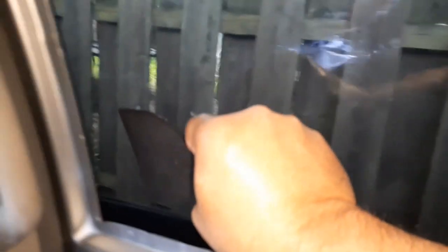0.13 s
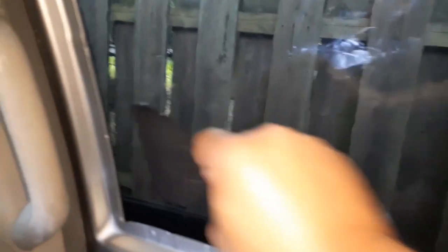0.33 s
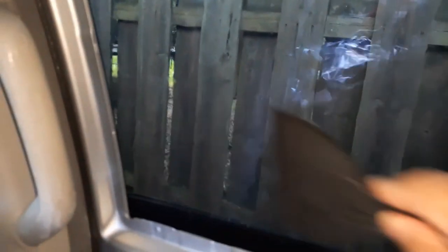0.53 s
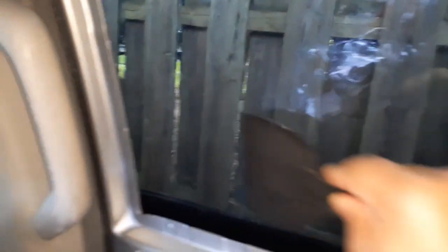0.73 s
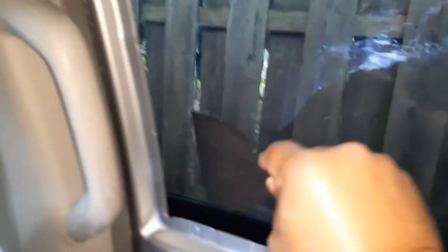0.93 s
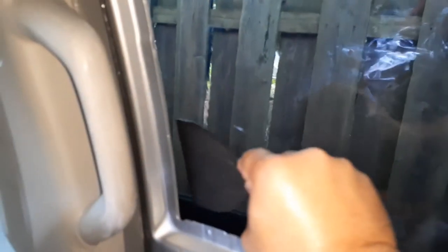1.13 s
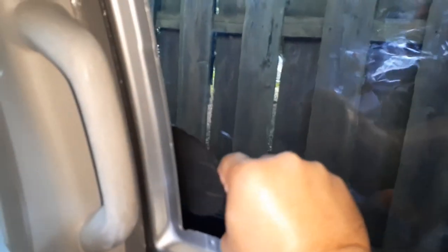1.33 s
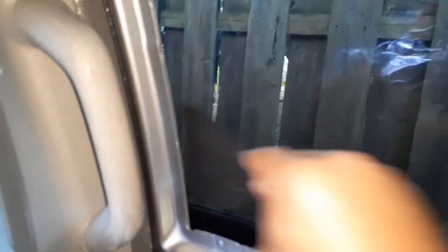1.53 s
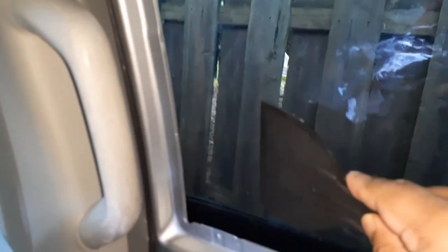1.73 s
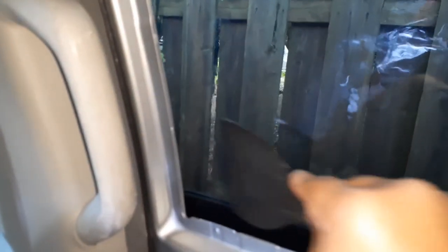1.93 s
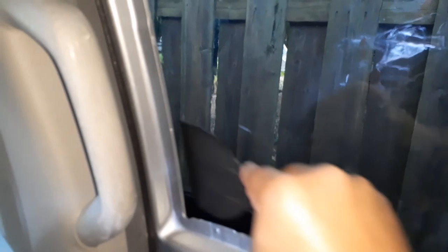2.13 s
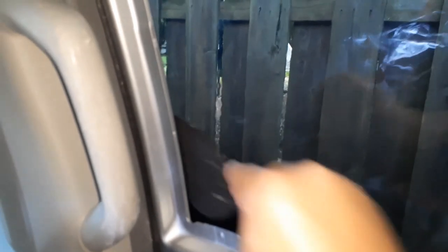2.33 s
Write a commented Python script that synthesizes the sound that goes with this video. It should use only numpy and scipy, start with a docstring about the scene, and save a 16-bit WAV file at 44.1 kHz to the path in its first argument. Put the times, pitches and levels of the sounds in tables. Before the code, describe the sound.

A plastic squeegee knocks on a car window frame with a hollow boom, ticks lightly, knocks twice softly, then ends in a scrape and loud clacks; close stereo microphone inside the car, low rumble and faint chips outside.

```python
"""A low rumble and a dull wash outside, heard from inside a car, with a faint hum of the side window.
A plastic hand squeegee then works over wet film on the glass: blade on frame gives clack and boom,
light touches tick and ring, slips give pips and a scrape. A small animal, perhaps a chipmunk, chips 3 times.
Shaped noise makes wash, roar, clacks and grains; decaying sines make the ringing parts.
The rumble adds wavering sines to noise; each chip is a falling sine smeared by echoes."""
import sys
import numpy as np
from scipy import signal
from scipy.fft import rfft, irfft
from scipy.io import wavfile
from scipy.ndimage import uniform_filter1d

SR = 44100
rng = np.random.default_rng(int(sys.argv[2]) if len(sys.argv) > 2 else 0)


def wav_out(sig):
    """Save sig, one row per channel (or a flat mono array), as 16-bit PCM at SR to the path in sys.argv[1]."""
    wavfile.write(sys.argv[1], SR, np.round(np.clip(np.atleast_2d(sig).T, -1, 1) * 32767).astype(np.int16))


N = 105222
T = np.arange(SR * 3 // 4) / SR  # time axis of one event, s

# Spectra: freq_hz, relative_db_per_hz. Decay bands: freq_hz, t60_s. Modes: freq_hz, relative_db, t60_s.
# left-right likeness of near and far sounds: freq_hz, correlation
NEAR_LIKENESS = [(60, .93), (130, 1), (300, 0.36), (640, 0.66), (1400, -0.22), (3000, -0.14),
                 (15000, 0.021)]
FAR_LIKENESS = [(60, 0.99), (130, 0.98), (290, 0.87), (640, 0.31), (1400, 0), (15000, 0.039)]

# rumble spectrum: freq_hz, relative_db_per_hz
RUMBLE_SPECTRUM = [(20, -48), (40, -28), (65, -2), (92, -3), (120, -8.5), (170, -12), (240, -12),
                   (300, -15), (400, -55), (800, -48.5), (2000, -90)]
# beating tones in the rumble: freq_hz, level_over_rumble_noise_db
DRONE_TONES = [(66, -9), (78, -9), (91.5, -1), (105, -9)]
# wash spectrum: freq_hz, relative_db_per_hz
WASH_SPECTRUM = [(100, 6), (400, -5), (560, -2), (800, 4), (1700, 3), (2300, -6), (3000, -20),
                 (5800, -28.5), (7300, -30.5), (9000, -23), (15500, -26)]
# outdoor levels: time_s, rumble_db, wash_db
OUTDOOR_LEVELS = [(0, -58, -63), (.25, -55, -62), (.7, -51, -61), (1.099, -53.5, -62), (1.35, -51, -58),
                  (1.8, -50.5, -58), (1.94, -48, -56.5), (2.02, -48.5, -57.5), (2.38, -53.5, -57)]
# low-mid roar spectrum: freq_hz, relative_db_per_hz
ROAR_SPECTRUM = [(100, -21), (220, 7), (300, -0.5), (430, -0.5), (550, -6), (900, -12.5), (2000, -46.5)]
# roar level: time_s, level_db
ROAR_LEVELS = [(0, -80), (1.1, -72), (1.8, -62.5), (2.38, -65)]
WAVER_RMS_HZ = 1.85

# chips: start_s, level_db
CHIP_CALLS = [(0.52, -44), (1.188, -44.5), (1.842, -44)]
# path of one chip: time_from_start_s, pitch_hz, relative_db
CHIP_PATH = [(0, 11450, -6.5), (.010, 11400, -5), (.018, 10950, -7.5), (0.023, 9300, -12.5),
             (0.034, 7900, -11.5), (.038, 6200, -11), (.047, 4940, -14), (.056, 4350, -13)]
CHIP_JITTER_RATIO, CHIP_PAN_DB = 0.011, -3
YARD_T60_S, YARD_RISE_S = 0.23, 0.033

# wet pips of the blade on the film: start_s, pitch_hz, level_db
WET_PIPS = [(1.308, 1690, -49), (2.146, 1725, -38.5)]
# gritty scrape: time_s, level_db
SCRAPE_LEVELS = [(2.225, -78), (2.234, -55), (2.254, -44), (2.272, -47), (2.286, -68)]
# scrape grain spectrum: freq_hz, relative_db_per_hz
GRAIN_SPECTRUM = [(200, -12), (420, -16), (590, 5), (1000, -13), (1700, 14), (3200, -3), (5000, -17),
                  (7000, -19), (10000, -18), (16000, -32)]
PIP_T60_S, PIP_RISE_S = 0.019, 0.0013
GRAINS_PER_S, GRAIN_SPREAD_DB, GRAIN_T60_S = 600, 5, 0.012

# blade touches on glass: start_s, click_db, tilt_db_per_octave, ring_db, left_minus_right_db
BLADE_TICKS = [(0.5422, -33, 1, -59, 1), (0.5737, -33.5, -1.5, -47, 2.5), (1.48, -40, 0, -58, -5),
               (1.4932, -38, 0, -54, 0.5), (1.669, -41, -1.5, -50.5, -1), (1.692, -49, -1, -61, 3),
               (1.706, -51.5, 1, -57.5, 0), (1.7915, -55.5, 6, -75, -1), (2.2466, -39, -4.5, -46.5, -7),
               (2.2532, -39, -0.5, -54, -4), (2.267, -35.5, -4.5, -55, 2)]
# click spectrum: freq_hz, relative_db_per_hz
TICK_SPECTRUM = [(100, 5), (300, 7), (600, -11), (1100, 0), (1600, 3.5), (2600, -3), (5000, -9),
                 (7500, -16.5), (11000, -12), (16000, -20)]
# blade edge modes: freq_hz, relative_db, t60_s
BLADE_EDGE_MODES = [(1410, -11, 0.042), (1646, -14, 0.004), (5260, -18, 0.0037)]
# ring spectrum: freq_hz, relative_db_per_hz
RING_SPECTRUM = [(80, -36), (200, 12), (300, -1.5), (480, -20), (670, -1.5), (900, -17), (2000, -27),
                 (5000, -71)]
# plastic card modes: freq_hz, relative_db, t60_s
PLASTIC_CARD_MODES = [(645, -6.5, 0.23), (685, -8, 0.27), (772, -9.5, .2), (2440, -18, 0.13),
                      (2640, -15, 0.094)]
TICK_T60_S, TICK_RISE_S, TICK_TAIL_DB, TICK_TAIL_T60_S = 0.009, 0.00031, -11, 0.16
RING_T60_S, RING_RISE_S, RING_NOISE_DB, CARD_DB = 0.25, 0.004, -1.5, 4

# blade on frame: start_s, clack_db, treble_tilt_db_per_octave, boom_db, left_minus_right_db
FRAME_KNOCKS = [(.2730, -31.5, 1, -31, -1), (1.3783, -35, 0, -35, -4.5), (1.419, -35, -0.7, -37, -3.5),
                (2.2855, -30.5, -5.5, -27, 4.5), (2.3015, -20.5, 2.95, -25, -4),
                (2.3463, -23.5, 1.86, -30, -3.5)]
# clack spectrum of blade and frame: freq_hz, relative_db_per_hz
CLACK_SPECTRUM = [(100, -6.5), (450, -4), (680, 3.5), (1000, -8), (1500, 8), (2300, -1.5), (3300, -7),
                  (4300, 1.5), (5500, -1.5), (6900, -8.5), (8800, -10.5), (10700, -7), (13000, -10),
                  (16000, -25.5)]
# clack decay: freq_hz, t60_s
CLACK_DECAY = [(300, 0.067), (1000, 0.29), (2000, 0.13), (4500, 0.072), (10000, 0.063), (16000, 0.032)]
# window frame modes: freq_hz, relative_db, t60_s
WINDOW_FRAME_MODES = [(673, -3, 0.086), (947, -13, 0.18), (1492, -23.5, 0.14), (1717, -14, 0.095),
                      (1890, -11.5, 0.11), (2463, -21, 0.17), (4060, -6, 0.06), (4500, -11, 0.063),
                      (4900, -8.5, 0.04)]
# door and cabin boom spectrum: freq_hz, relative_db_per_hz
BOOM_SPECTRUM = [(30, -56), (70, 4), (130, -6.5), (280, -2.5), (420, -6), (680, -6), (1000, -14.5),
                 (1600, -27.5), (3000, -32.5), (5000, -33), (8000, -40.5), (16000, -43)]
# boom decay: freq_hz, t60_s
BOOM_DECAY = [(70, 0.42), (250, 0.69), (600, 0.16), (1500, 0.47), (5000, 0.18), (16000, 0.5)]
# modes of the pane in its door: freq_hz, relative_db, t60_s
PANE_MODES = [(84.93, -13.5, 1), (127.3, -7.5, 0.79), (172.44, -5.5, 1), (195, -5, 0.93), (244.6, -7, 0.79),
              (280.5, -3, 0.74), (303.7, -14, 0.42), (392, -11, 0.56), (560, -10.5, 0.356),
              (664.8, -6.5, .3), (679.4, 4.5, 0.17), (799, -13, 0.38), (1268, -18, 0.61)]
# faint pane hum at the start: freq_hz, level_db, t60_s
OPENING_HUM = [(167.5, -57.5, 1.66)]
# knocks at the microphone: freq_hz, left_minus_right_db
KNOCK_BALANCE = [(60, -4.5), (150, -3.5), (400, -2), (1200, 2), (2400, 3), (4500, -1), (8500, 1.5),
                 (12000, -1), (16000, 4.5)]
CLACK_RISE_S, CLACK_HOLD_S, SHARED_BODY_POWER, FRAME_DB = 0.00062, 0.003, 0.75, -1
SNAP_DB, SNAP_T60_S = 1, 0.021
BOOM_DB, BOOM_RISE_S, BOOM_HOLD_S = -2, 0.013, 0.013
PANE_DB, PANE_RISE_S = -1.5, 0.016

BAND_LIMIT_HZ = 16100


def amp(db):
    """Decibels to gain."""
    return 10 ** (np.asarray(db) / 20)


def evened(x):
    """Scales to rms 1."""
    return x / np.sqrt(np.mean(x ** 2) + 1e-20)


def read(points, hz):
    """Interpolates a two-column table on a log-frequency axis."""
    f, value = np.transpose(points)
    return np.interp(np.log(hz + 1), np.log(f + 1), value)


def pan(db):
    """Left and right gains for a level difference."""
    return amp([[db / 2], [-db / 2]])


def add(mix, start_s, sound):
    """Mixes a sound in at start_s, cut at the end of the mix."""
    part = mix[:, round(start_s * SR):][:, :sound.shape[1]]
    part += sound[:, :part.shape[1]]


def octaves_over_1k(hz):
    """Octaves above 1 kHz, zero below it."""
    return np.log2(np.maximum(hz, 1000) / 1000)


def noise(spectrum, likeness, size, tilt_db=0):
    """Stereo noise of rms 1 with a given colour and left-right correlation."""
    hz = np.fft.rfftfreq(size, 1 / SR)
    a, b = rfft(rng.standard_normal((2, size)))
    c = np.clip(read(likeness, hz), -1, 1)
    right = c * a + np.sqrt(1 - c ** 2) * b
    colour = amp(read(spectrum, hz) + tilt_db * octaves_over_1k(hz))
    return evened(irfft(np.array([a, right]) * colour, size))


def fade(t60_s, rise_s, hold_s=0):
    """Exponential rise with time constant rise_s, hold, exponential decay."""
    decay = 1e-3 ** (np.maximum(T - hold_s, 0) / t60_s)
    return (1 - np.exp(-T / rise_s)) * decay


def die_away(x, decay, rise_s, hold_s=0):
    """Lets each band of x decay at its own speed; overlapping bands sum to unity."""
    hz, z = np.fft.rfftfreq(len(T), 1 / SR), rfft(x)
    centres_hz = [f for f, _ in decay]
    out = 0
    for weights, (_, t60_s) in zip(np.eye(len(decay)), decay):
        band_gain = read(list(zip(centres_hz, weights)), hz)
        out = out + irfft(z * band_gain, len(T)) * fade(t60_s, rise_s, hold_s)
    return out


def modes(table, rise_s, apart_cycles):
    """Decaying sine partials with random phase, a little out of step between left and right."""
    draws = rng.standard_normal((len(table), 3, 1))
    out = 0
    for (hz, db, t60_s), p in zip(table, draws):
        cycles = hz * T + p[0] + apart_cycles * p[1:]
        out = out + amp(db) * np.sin(2 * np.pi * cycles) * fade(t60_s, rise_s)
    return out


def outdoor_rumble():
    """Low noise plus tones of wavering pitch that beat, like a far engine."""
    t = np.arange(N) / SR
    time_s, rumble_db, _ = np.transpose(OUTDOOR_LEVELS)
    low = noise(RUMBLE_SPECTRUM, FAR_LIKENESS, N)
    for hz, db in DRONE_TONES:
        waver = np.interp(t, np.linspace(0, t[-1], 24), rng.standard_normal(24))
        cycles = np.cumsum(hz + WAVER_RMS_HZ * waver) / SR
        low = low + amp(db) * np.sqrt(2) * np.sin(2 * np.pi * cycles)
    return amp(np.interp(t, time_s, rumble_db)) * evened(low)


def outdoor_wash():
    """Dull distant wash: broadband noise with a slow swell."""
    time_s, _, wash_db = np.transpose(OUTDOOR_LEVELS)
    level_db = np.interp(np.arange(N) / SR, time_s, wash_db)
    return amp(level_db) * noise(WASH_SPECTRUM, FAR_LIKENESS, N)


def outdoor_roar():
    """Soft low-mid noise that grows, then eases slightly."""
    level_db = np.interp(np.arange(N) / SR, *np.transpose(ROAR_LEVELS))
    return amp(level_db) * noise(ROAR_SPECTRUM, FAR_LIKENESS, N)


def chips():
    """A thin whistle plunges from very high and is smeared by the echoes of the yard."""
    out = np.zeros((2, N))
    time_s, pitch_hz, path_db = np.transpose(CHIP_PATH)
    t = np.arange(0, time_s[-1], 1 / SR)
    for start_s, level_db in CHIP_CALLS:
        jitter = evened(uniform_filter1d(rng.standard_normal(len(T)), size=12))[:len(t)]
        cycles = np.cumsum(np.interp(t, time_s, pitch_hz) * (1 + CHIP_JITTER_RATIO * jitter)) / SR
        call = amp(np.interp(t, time_s, path_db)) * np.sin(2 * np.pi * cycles)
        yard = rng.standard_normal((2, len(T))) * fade(YARD_T60_S, YARD_RISE_S)
        yard = yard / np.linalg.norm(yard[0])
        add(out, start_s, amp(level_db) * signal.fftconvolve(call[None], yard, axes=1))
    return out * pan(CHIP_PAN_DB)


def scrape():
    """The blade slips on the film in random, uneven grains of short noise."""
    hits = rng.random(N) < GRAINS_PER_S / SR
    slips = hits * amp(GRAIN_SPREAD_DB * np.minimum(rng.exponential(1, N), 3))
    grain = noise(GRAIN_SPECTRUM, NEAR_LIKENESS, len(T)) * fade(GRAIN_T60_S, 0.00017)
    grains = evened(signal.fftconvolve(slips[None], grain, axes=1)[:, :N])
    # silent outside the table
    level_db = np.interp(np.arange(N) / SR, *np.transpose(SCRAPE_LEVELS), left=-np.inf, right=-np.inf)
    return grains * amp(level_db)


def pips():
    """Small wet pips of the blade on the film, each one short decaying sine."""
    out = np.zeros((2, N))
    for start_s, hz, db in WET_PIPS:
        add(out, start_s, modes([(hz, db, PIP_T60_S)], PIP_RISE_S, apart_cycles=0.05))
    return out


def ticks():
    """A short click with blade-edge modes, its tail in the cabin, and a soft ring of card and glass."""
    out = np.zeros((2, N))
    for start_s, click_db, tilt_db, ring_db, pan_db in BLADE_TICKS:
        shape = fade(TICK_T60_S, TICK_RISE_S, 0.00033)
        shape = shape + amp(TICK_TAIL_DB) * fade(TICK_TAIL_T60_S, 0.001)
        click = noise(TICK_SPECTRUM, NEAR_LIKENESS, len(T), tilt_db) * shape
        click = click + modes(BLADE_EDGE_MODES, TICK_RISE_S, apart_cycles=0.091)
        glass = noise(RING_SPECTRUM, NEAR_LIKENESS, len(T)) * fade(RING_T60_S, RING_RISE_S, 0.021)
        card = modes(PLASTIC_CARD_MODES, RING_RISE_S, apart_cycles=0.029)
        ring = amp(RING_NOISE_DB) * glass + amp(CARD_DB) * card
        add(out, start_s, pan(pan_db) * (amp(click_db) * click + amp(ring_db) * ring))
    return out


def clack(body, tilt_db):
    """Plastic on frame: partly shared noise and frame modes, tilted at equal power, plus a brief snap."""
    fresh = noise(CLACK_SPECTRUM, NEAR_LIKENESS, len(T))
    struck = np.sqrt(SHARED_BODY_POWER) * body + np.sqrt(1 - SHARED_BODY_POWER) * fresh
    plain = die_away(struck, CLACK_DECAY, CLACK_RISE_S, CLACK_HOLD_S)
    plain = plain + amp(FRAME_DB) * modes(WINDOW_FRAME_MODES, CLACK_RISE_S, apart_cycles=0.18)
    tilt = amp(tilt_db * octaves_over_1k(np.fft.rfftfreq(len(T), 1 / SR)))
    tilted = evened(irfft(rfft(plain) * tilt, len(T))) * plain.std()
    snap = noise(CLACK_SPECTRUM, NEAR_LIKENESS, len(T), tilt_db) * fade(SNAP_T60_S, CLACK_RISE_S, 0.00086)
    return tilted + amp(SNAP_DB) * snap


def boom():
    """Door and cabin resound as decaying noise, the pane as modes."""
    cabin = noise(BOOM_SPECTRUM, NEAR_LIKENESS, len(T))
    cabin = die_away(cabin, BOOM_DECAY, BOOM_RISE_S, BOOM_HOLD_S)
    pane = modes(PANE_MODES, PANE_RISE_S, apart_cycles=0.081)
    return amp(BOOM_DB) * cabin + amp(PANE_DB) * pane


def knocks():
    """Each blow on the frame is a clack plus a boom; a faint pane hum opens the scene."""
    out = np.zeros((2, N))
    body = noise(CLACK_SPECTRUM, NEAR_LIKENESS, len(T))
    for start_s, clack_db, tilt_db, boom_db, pan_db in FRAME_KNOCKS:
        blow = amp(clack_db) * pan(pan_db) * clack(body, tilt_db)
        add(out, start_s, blow + amp(boom_db) * boom())
    add(out, 0, modes(OPENING_HUM, PANE_RISE_S, apart_cycles=0.042))
    lean_db = read(KNOCK_BALANCE, np.fft.rfftfreq(2 * N, 1 / SR))
    return irfft(rfft(out, 2 * N) * amp([lean_db / 2, -lean_db / 2]))[:, :N]


def scene():
    """The yard behind the glass, the squeegee close by."""
    outdoors = outdoor_rumble() + outdoor_wash() + outdoor_roar() + chips()
    squeegee = scrape() + pips() + ticks() + knocks()
    return outdoors + squeegee


def record(dry):
    """Band limit: a linear-phase low-pass."""
    lowpass = signal.firwin(255, BAND_LIMIT_HZ, window=("kaiser", 8), fs=SR)
    return signal.oaconvolve(dry, lowpass[None], "same")


dry = scene()
out = record(dry)
wav_out(out)
```